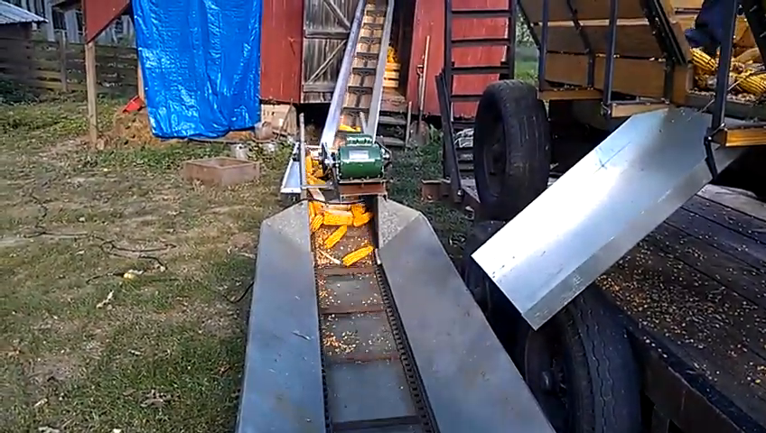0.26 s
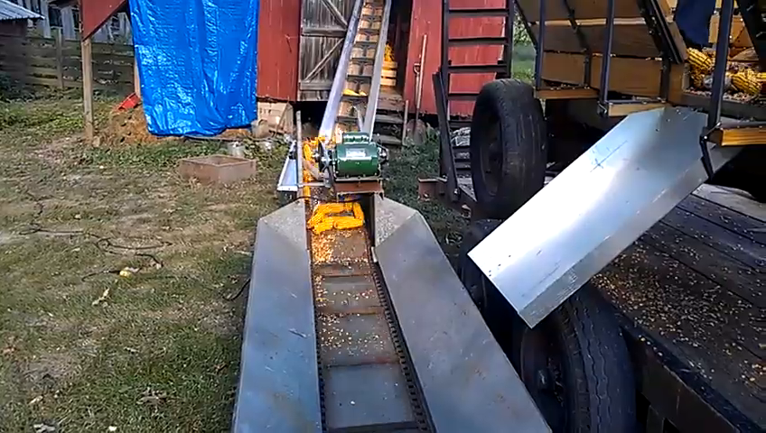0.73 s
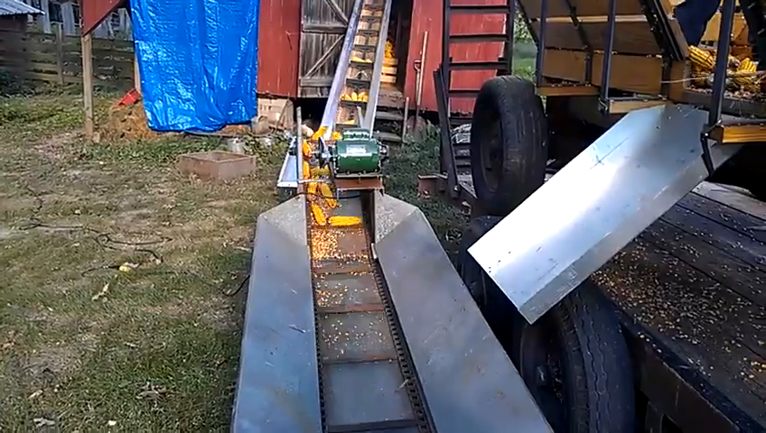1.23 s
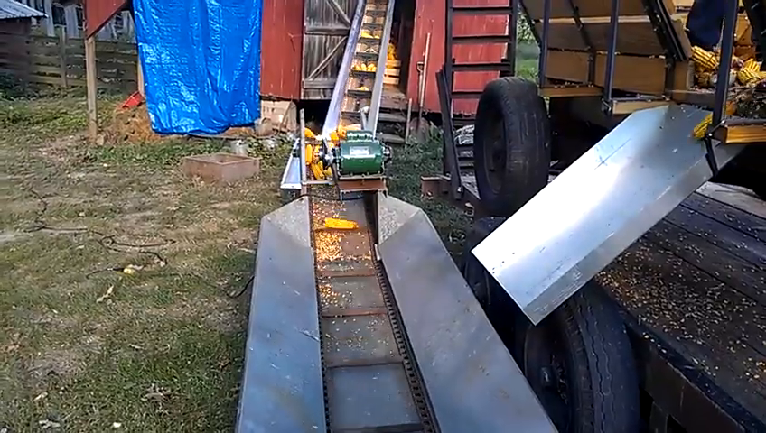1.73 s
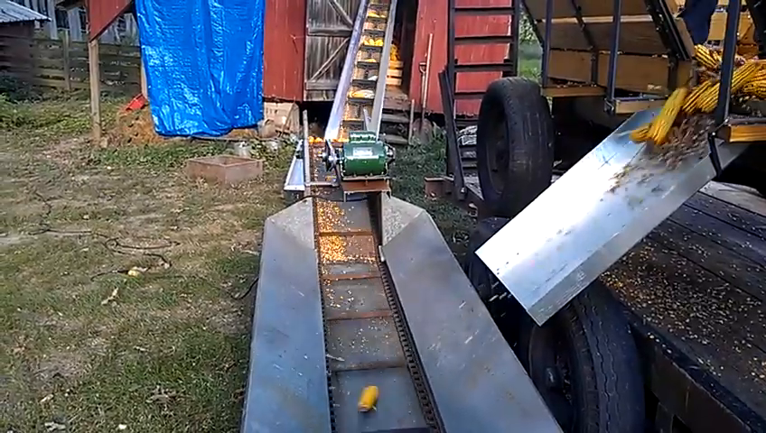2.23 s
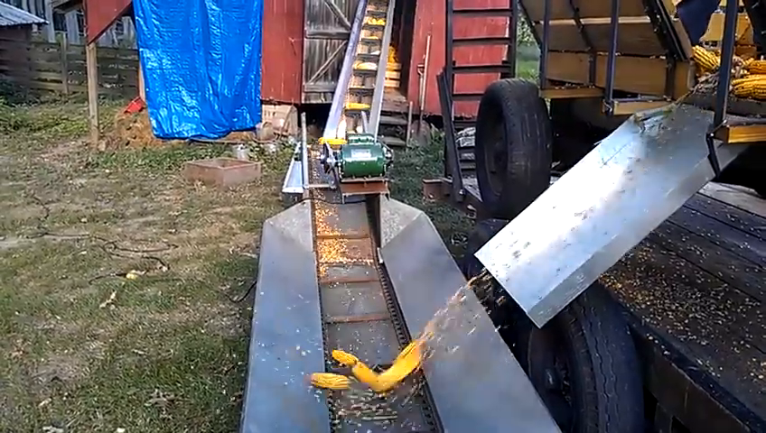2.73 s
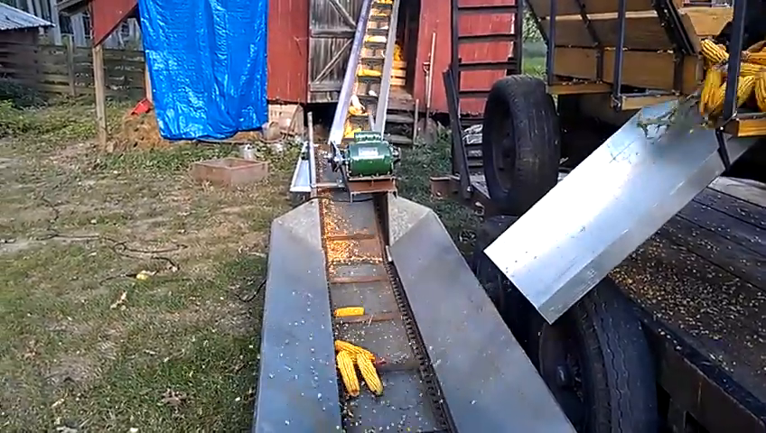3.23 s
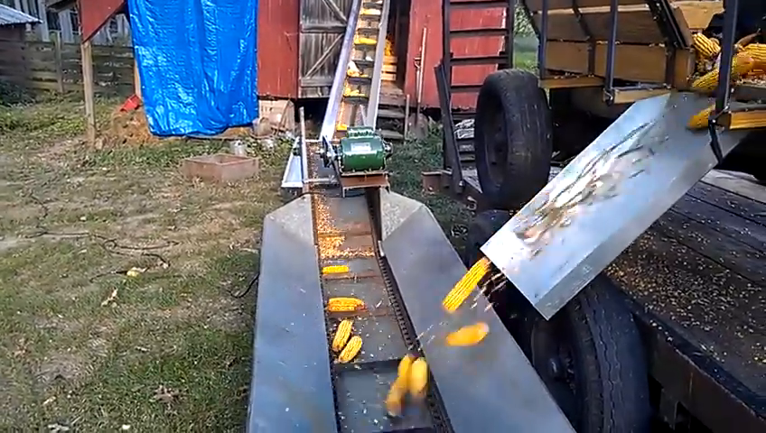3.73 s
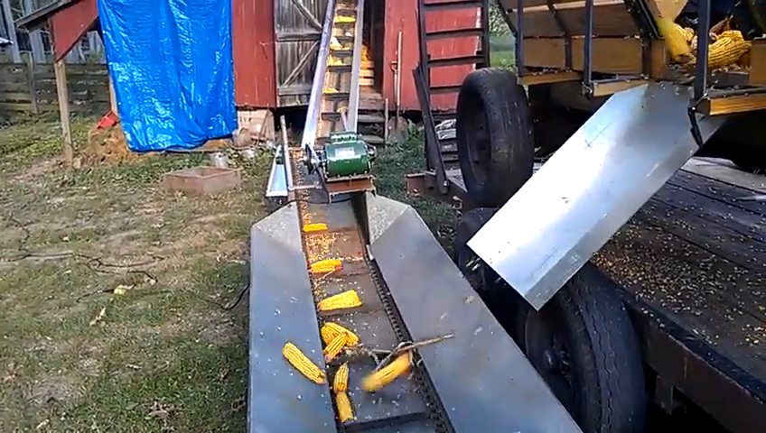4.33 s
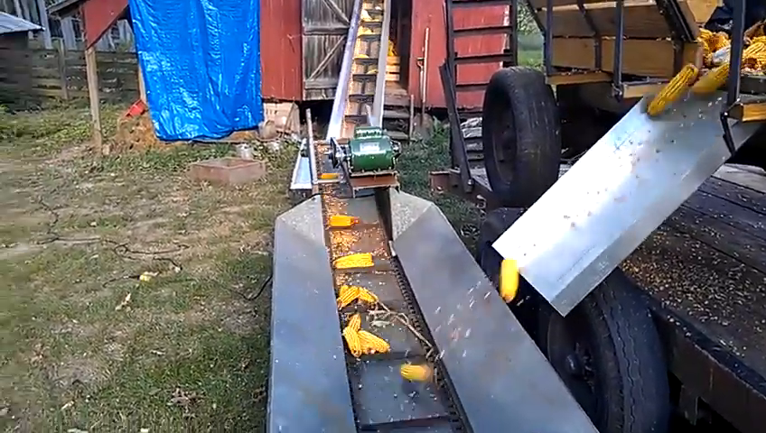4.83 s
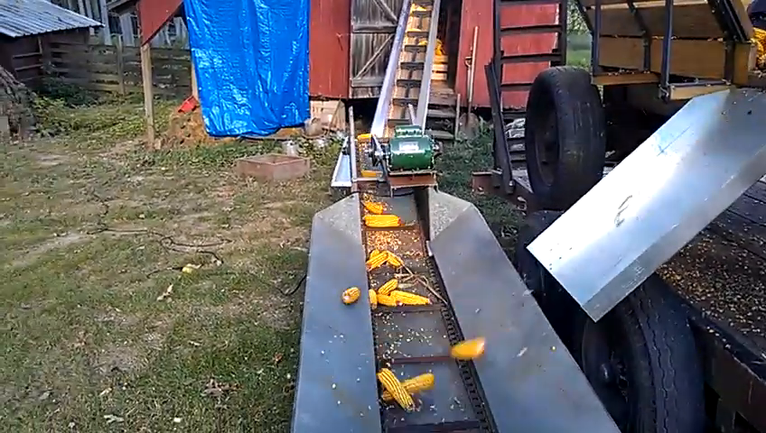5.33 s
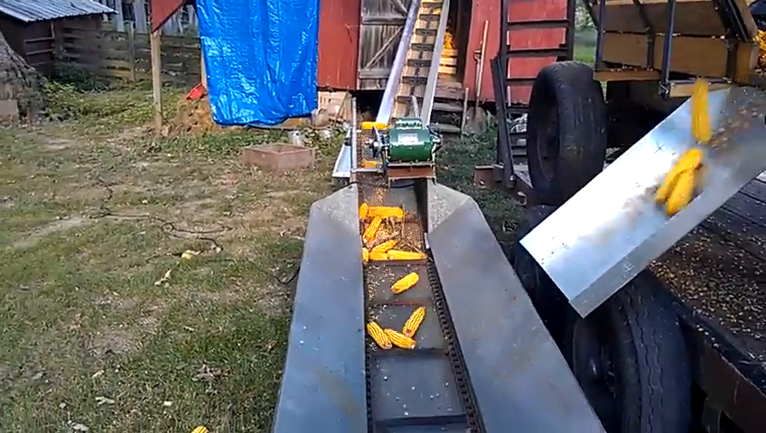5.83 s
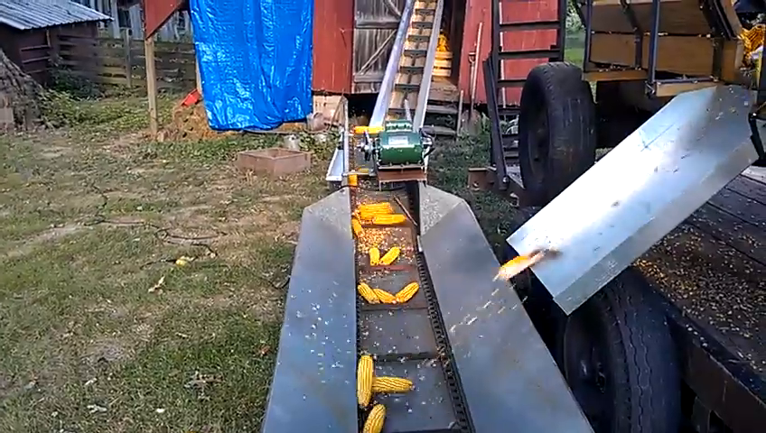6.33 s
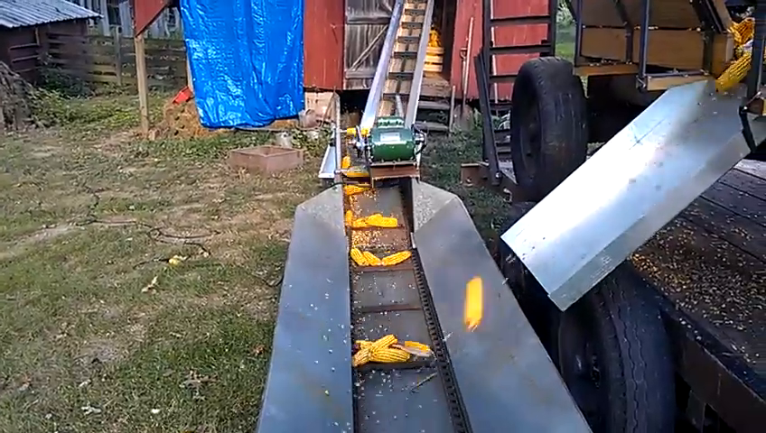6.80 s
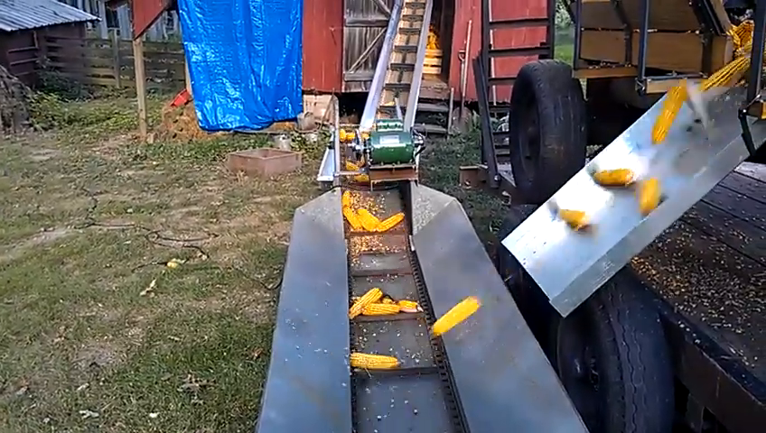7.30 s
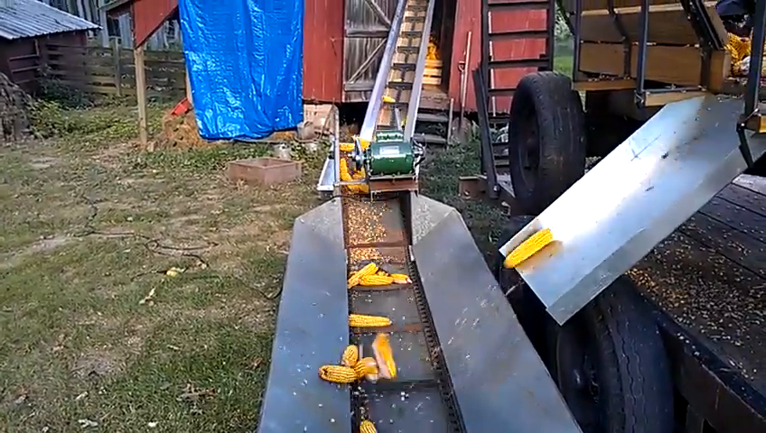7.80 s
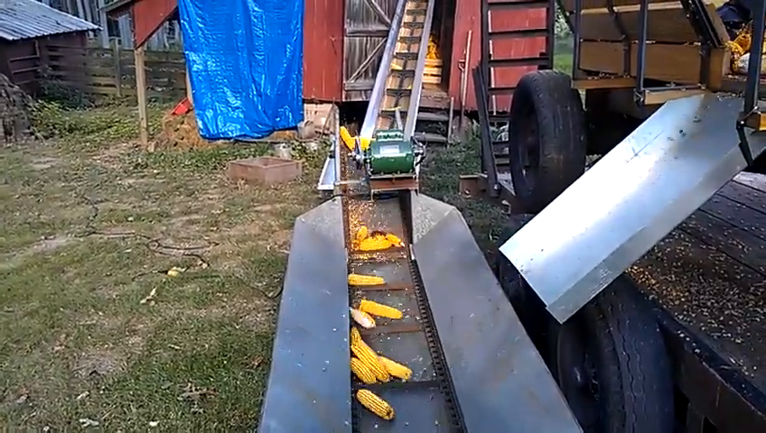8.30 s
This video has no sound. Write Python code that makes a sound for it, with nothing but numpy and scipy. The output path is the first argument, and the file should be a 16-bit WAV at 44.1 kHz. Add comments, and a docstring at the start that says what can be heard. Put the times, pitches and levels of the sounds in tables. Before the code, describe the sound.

A chain conveyor clatters and drones in a steel trough while ears of corn thud and tumble down a metal chute, loose kernels pattering.

```python
"""Chain conveyor carrying ears of corn

In a farmyard, close to a phone microphone, a chain drags slats along a sheet-steel trough: drone, boom and clatter.
Ears of corn bang down a steel chute into the trough, each a dull blow and a tumble; loose kernels patter.
The rattle swells and dips again and again. Every sound is random or timed blows ringing the modes of steel sheet.
"""
import sys
import numpy as np
from scipy import signal
from scipy.fft import rfft, irfft, next_fast_len
from scipy.io import wavfile
from scipy.ndimage import uniform_filter1d

SR = 44100
rng = np.random.default_rng(int(sys.argv[2]) if len(sys.argv) > 2 else 0)


def generate_wav(signal):
    """Clip the signal to [-1, 1] and save it as 16-bit WAV at the path in sys.argv[1]."""
    frames = np.transpose(np.atleast_2d(signal))
    scaled = np.clip(frames, -1, 1) * 32767
    pcm = np.round(scaled).astype(np.int16)
    wavfile.write(sys.argv[1], SR, pcm)


N = 377045  # samples
TOP_HZ = 15650  # highest mode of the steel and edge of the microphone's treble cut

# How strongly small hard knocks, of kernels on steel, ring the sheet: (frequency [Hz], relative level [dB])
PATTER_COLOUR = [(500, -21), (2000, 1.5), (3200, -2.5), (4300, 1.5), (5600, -3.5), (6800, -13.5),
                 (8200, -5), (10500, -5), (13000, -16.5), (15500, -23)]


def conveyor(drone_db, clatter_db, boom_db, steel):
    """Slats scraping the floor make the trough drone and boom; links knock each other and the rails."""
    # How strongly each kind of blow rings the sheet: (frequency [Hz], relative level [dB])
    drone_colour = [(300, -16.5), (430, -23.5), (560, -9), (700, -0.5), (780, 1), (850, 1), (960, -4),
                    (1100, -16), (2000, -11), (5000, -79)]
    boom_colour = [(150, -40), (200, -28), (240, -14.5), (275, -10.5), (300, 3), (325, -7.5), (390, -7),
                   (480, -29.5), (800, -70)]
    clatter_colour = [(300, -58), (1000, -13), (1400, -3), (1900, -0.5), (2500, -5.5), (3100, -11.5),
                      (4300, -12.5), (5500, -18.5), (6300, -24.5), (7000, -30), (8200, -25.5), (9700, -25),
                      (12000, -36.5), (15500, -84)]
    shared_flicker = flicker(12, 0.27)
    slats = hail(900, 1.8)
    links = hail(2000, 2.6)
    drone = strike(slats * shared_flicker * flicker(17, 0.87), drone_colour, steel)
    boom = strike(slats, boom_colour, steel)
    clatter = strike(links * shared_flicker, clatter_colour, steel)
    return undb(drone_db) * drone + undb(boom_db) * boom + undb(clatter_db) * clatter


def ears(steel):
    """A dull first blow on one spot, then the ear tumbles: many rows of kernels knock while it rolls to rest."""
    # Ears striking steel, before the mix gains below:
    # (time [s], level [dB], treble over the thud [dB], first blow over the tumble [dB])
    landings = [(0.231, -18, -30, -6), (0.296, -12, -23, 10), (0.343, -13, -24, 1), (0.405, -8, -20, 7.5),
                (0.45, -9.5, -19, 4), (0.642, -16, -18, 3), (0.759, -9.5, -31, 8), (0.803, -6, -16, -2),
                (0.865, -15, -17, 11), (0.921, -12.5, -16, 10), (0.979, 0.5, -20, 1), (1.201, -9.5, -20, 3),
                (1.324, -11, -26, 4), (1.489, -4, -19, 3), (1.53, -2.5, -19.5, 7), (1.78, -10, -16, 3),
                (1.833, -5, -30, -3), (1.949, -13, -21, 2), (2.042, -4, -30, 1), (2.258, -12, -10, -6),
                (2.287, -15, -11, -1), (2.331, -6, -11.5, 11), (2.654, -10, -20, 5), (2.672, -6, -10, 0),
                (2.743, -6, -9, 0), (2.898, -11, -25, 4), (3.19, -8, -12, 0), (3.266, -7, -25, 0),
                (3.304, -12, -20, -2), (3.354, -10, -23, 7), (3.42, -10, -25, 0), (3.474, -14, -19, 5),
                (3.494, 1.5, -17.5, -5), (3.64, -8.5, -21, 0), (3.788, -8, -12.5, 6),
                (3.838, -1.5, -14.5, 9), (4.191, -14, -10, -3), (4.298, -7, -19, -5), (4.449, -4, -18, 4),
                (4.762, -12, -24, 8), (4.928, -1, -13.5, 2), (5.077, -11, -19, 3), (5.386, -5.5, -26, 8),
                (5.404, 3.5, -17, 5), (5.484, -7, -19, 0), (5.61, -10, -26, -3), (5.739, -10, -21, -2),
                (5.776, -7.5, -24, 8.5), (5.799, -13, -20, 3), (5.891, -0.5, -22, -2), (5.956, -7, -17, 0),
                (6.028, -11, -24, 1), (6.127, 0.5, -14, -1.5), (6.237, -6, -22, 3), (6.635, -1.5, -15, -1),
                (6.803, -6, -27, 4.5), (6.841, -9, -19, 2), (6.867, -9.5, -29, 5), (6.942, -4.5, -21, 6.5),
                (6.982, 3.5, -16.5, -2), (7.296, -10, -21, 7), (7.342, -9, -19, 5), (7.39, -8, -19, 4),
                (7.467, 1, -22, 1), (7.65, -6, -11, 2), (7.672, -1.5, -18.5, 6), (7.763, -8, -19, 2),
                (8.028, -16, -23, 6), (8.063, -9, -16, 0), (8.1, -9, -16, 2), (8.286, -7, -19, 0),
                (8.34, -18, -25, 3), (8.529, -13, -31, 3)]
    # How the first blow and the tumble ring the sheet: (frequency [Hz], relative level [dB])
    knock_colour = [(200, -18), (300, 0.5), (480, -12.5), (680, 5.5), (900, -1.5), (1100, -15),
                    (1900, -8.5), (3200, -17), (8000, -40), (15500, -60)]
    thud_colour = [(150, -52), (220, -21), (300, 1), (440, -15), (720, 10.5), (950, 4), (1100, -27),
                   (1900, 1), (3200, -4.5), (6000, -58)]
    tumble_ms = 20.6
    times, level_db, treble_db, blow_db = np.transpose(landings)
    knocks = hail(1500, 2.0)

    first_blows = np.zeros_like(knocks)
    spot = np.arange(len(times)) % len(first_blows)  # the ears take the spots in turn
    first_blows[spot, (times * SR).astype(int)] = undb(level_db + blow_db)

    thud_flow = bursts(times, level_db, tumble_ms)
    crack_flow = bursts(times, level_db + treble_db, tumble_ms)
    blow = strike(first_blows, knock_colour, steel)
    tumble = strike(knocks * thud_flow, thud_colour, steel)
    cracks = strike(knocks * crack_flow, PATTER_COLOUR, steel)
    return undb(8.5) * blow + undb(-17.0) * tumble + undb(-6.0) * cracks


def kernels(stream_db, steel):
    """Loose kernels tick on the chute and trough walls, singly and by the handful."""
    # Handfuls of kernels thrown on the steel, before the mix gain below: (time [s], level [dB])
    sprays = [(0.4633, -21), (0.85, -22), (0.9457, -20), (1.5239, -22), (1.8173, -30), (2.0403, -32),
              (2.3346, -25), (2.5511, -27), (2.5885, -34), (2.6529, -28), (2.75, -27), (3.15, -25),
              (3.201, -21), (3.3094, -26), (3.4665, -28), (3.6436, -21), (3.8, -12.5), (3.8377, -15),
              (4.2, -18), (4.2428, -22), (4.2911, -18), (4.373, -23), (4.4478, -21), (4.6987, -22),
              (4.9, -19), (4.935, -16), (5.055, -21), (5.3023, -31), (5.378, -19), (5.43, -20),
              (5.4939, -19), (5.78, -24), (5.8326, -21), (5.9499, -23), (6.0272, -31), (6.092, -23),
              (6.137, -21), (6.6358, -21), (6.6932, -24), (6.8882, -22), (6.9895, -12.5), (7.2948, -22),
              (7.3302, -19), (7.3672, -21), (7.4764, -13), (7.6031, -23), (7.6595, -20), (7.8396, -25),
              (8.0755, -12)]
    spray_ms, spray_rise_ms = 28, 4.6
    times, level_db = np.transpose(sprays)
    stream = flicker(14, 2.9) * undb(stream_db)
    handfuls = undb(-10) * bursts(times, level_db, spray_ms, spray_rise_ms)
    return strike(hail(2200, 3.9) * (stream + handfuls), PATTER_COLOUR, steel)


def running_levels():
    """Drone, clatter, boom and kernel-stream levels in dB at every sample, with their swells and dips."""
    # Swells of the rattle; a negative lift lowers it:
    # (time of the top [s], drone lift [dB], clatter lift [dB], boom lift [dB])
    surges = [(.005, 5.5, 5, 11), (.36, 5.5, 4, 3), (.48, 3, 6.5, -5), (.88, 3.5, 2, 2), (.95, 3, 3, 1),
              (1.0, 3, 8, 8), (1.33, 1.5, 1.5, 5), (1.534, 8.5, 10, -1), (1.83, 2, 7.5, 5),
              (1.96, 4.5, 1, 4), (2.063, 8, 9.5, -3), (2.13, 4.5, 3.5, 2), (2.331, 4, 3.7, 2),
              (2.365, 6, 3.5, -5), (2.68, 4.5, 5.5, -4), (2.77, 3, 5, 8), (3.17, 4, -0.8, 2),
              (3.22, 5.5, -2, 7), (3.33, 6, 0, 8), (3.43, 4, 0, 5), (3.5, 2, 8, 9), (3.57, 4.5, -0.5, 5),
              (3.8, 2.5, 3, 6), (3.84, 4.5, 2, 7), (4.21, 3.5, 0, 6), (4.312, 7, 6, 11), (4.378, 8, 6.5, 8),
              (4.455, 1, 0, -2), (4.81, 2.5, -1.5, -1), (4.951, 7, 9, 12.5), (4.985, 2.5, 2, 2),
              (5.12, 4.5, 0, -5), (5.412, 9.5, 9, -4), (5.45, 2, 3.5, 4), (6.05, 4.5, 2.3, 3),
              (6.17, 1, 7.5, 6), (6.24, 2, 1.5, 5), (6.64, 2, 6, 2), (6.675, 6.5, 2.5, 4), (6.9, 3, 0.5, 0),
              (6.95, 0, -2, 8), (7.002, 10, 8.5, 15), (7.43, 6.5, 2, 10), (7.49, 13, 5, 8), (7.67, 0, 7, 9),
              (7.79, 4.5, 2.5, -17), (8.05, 3, -3, -4), (8.097, 7, 11, 12), (8.36, 1.5, -1.5, -10),
              (8.47, 4, -0.5, 3)]
    # Dips of the whole rattle: (time of the bottom [s], depth [dB], recovery [s])
    lulls = [(.06, 4.5, 0.34), (.525, 4, 0.19), (1.085, 4.5, 0.12), (1.44, 0.5, 0.033), (1.67, 3, 0.16),
             (1.9, 4.5, 0.081), (2.19, 3.5, 0.047), (2.45, 7.5, 0.075), (2.5, 6, 0.079), (2.71, 4, 0.037),
             (2.86, 3, 0.07), (2.999, 11, 0.23), (3.25, 4.5, 0.046), (3.62, 2, 0.19), (3.91, 8, 0.24),
             (4.08, 7, 0.14), (4.28, 4, 0.05), (4.559, 9.5, 0.15), (5.02, 2, .08), (5.19, 5.5, 0.25),
             (5.57, 3, 0.2), (6.09, 3, 0.033), (6.29, 9, 0.3), (6.45, 10, 0.24), (6.72, 5, 0.15),
             (7.07, 5.5, 0.56), (7.6, 6, 0.035), (7.73, 5, 0.051), (7.81, 7, 0.13), (7.964, 9.5, 0.078),
             (8.192, 5.5, 0.17)]
    # Stream of loose kernels, before its share of swells and dips: (time [s], level [dB])
    stream = [(0, -46), (.8, -40), (1.0, -37), (1.15, -48), (2.45, -37), (2.55, -31.5), (2.8, -25),
              (3.0, -36.5), (3.3, -34.5), (3.6, -41), (4.1, -36), (4.7, -43.5), (5.3, -32.5), (5.6, -45),
              (6.07, -38), (6.12, -24), (6.25, -27.5), (6.29, -35.5), (6.8, -44), (7.3, -35), (7.9, -40),
              (8.25, -42), (8.55, -59)]
    drone_base_db, clatter_base_db, boom_base_db = -22.5, -23.5, -35  # before swells and dips
    surge_rise_s, surge_fall_s = 0.045, 0.044
    lull_fall_s, lull_bend = 0.062, 1.23  # a bend above 1 holds the bottom longer
    stream_surge, stream_dip = 0.83, 0.43  # the kernels' shares of the clatter lift and of the dips

    t = np.arange(0, N / SR + .002, .001)  # levels are drawn every millisecond
    bottom_s, depth_db, recovery_s = np.transpose(lulls)
    dip_db = depth_db @ tents(t, bottom_s, lull_fall_s, recovery_s, lull_bend)
    top_s, *lifts = np.transpose(surges)
    drone_up, clatter_up, boom_up = np.array(lifts) @ tents(t, top_s, surge_rise_s, surge_fall_s)

    drone_db = drone_base_db + drone_up - dip_db
    clatter_db = clatter_base_db + clatter_up - dip_db
    boom_db = boom_base_db + boom_up - dip_db
    stream_db = np.interp(t, *np.transpose(stream)) + stream_surge * clatter_up - stream_dip * dip_db
    sample_s = np.arange(N) / SR
    return [np.interp(sample_s, t, db) for db in (drone_db, clatter_db, boom_db, stream_db)]


def sheet():
    """Steel sheet has evenly dense modes: their pitches and fading rings, each of about equal energy."""
    t60_1khz_s, damping = 0.086, 0.32  # ring time at 1 kHz; power of frequency by which it shortens
    hz = np.arange(140, TOP_HZ, 20.)
    hz += rng.uniform(-6, 6, len(hz))
    t60 = t60_1khz_s * (hz / 1000) ** -damping
    t = np.arange(3072) / SR  # rings stop after 70 ms
    fade = np.exp(-np.log(1000) * np.outer(1 / t60, t))
    rings = np.sin(2 * np.pi * np.outer(hz, t)) * fade
    return hz, rings / np.sqrt(t60)[:, None]


def strike(blows, colour, steel):
    """Each row of blows falls on its own spot of the sheet, which rings every mode with its own share."""
    hz, rings = steel
    colour_hz, colour_db = np.transpose(colour)
    gain = undb(np.interp(np.log(hz), np.log(colour_hz), colour_db))
    share = rng.standard_normal((len(blows), len(hz)))
    share /= np.sqrt(np.sum(share ** 2, axis=0))  # over all spots, every mode gets its due
    spots = (share * gain) @ rings
    spots /= np.sqrt(np.sum(spots ** 2, axis=1, keepdims=True))  # every spot rings with equal energy
    size = next_fast_len(N + spots.shape[1])
    spectrum = np.sum(rfft(blows, size) * rfft(spots, size), axis=0)
    return irfft(spectrum, size)[:N]


def hail(rate, spread_db, clump_db=2.0, count=6):
    """Random ticks, rate a second over count spots; a few are harder than the rest, up to a limit."""
    spot, when, hard = rng.random((3, int(rate * N / SR)))
    spot = (spot * count).astype(int)
    # each spot is busy or quiet for some 40 ms at a time, so the ring keeps changing colour
    stretches = 214
    busy = rng.standard_normal((count, stretches))[spot, (when * stretches).astype(int)]
    hardness = np.minimum(-np.log(hard), 3.5)
    ticks = np.zeros((count, N))
    ticks[spot, (when * N).astype(int)] = undb(spread_db * hardness + clump_db * busy)
    return unit(ticks) / np.sqrt(count)


def flicker(rate, depth_db):
    """Random unevenness: the loudness takes random levels, rate a second, and slews between them."""
    hold = int(SR / rate)
    steps = np.repeat(rng.standard_normal(N // hold + 1), hold)
    return undb(depth_db * uniform_filter1d(steps, hold)[:N])


def bursts(times, level_db, ms, rise_ms=2):
    """Gains that rise at each time and die away over ms."""
    out = np.zeros(N + 4096)  # room for the last tail
    age_ms = np.arange(4096) / SR * 1000
    shape = np.minimum(age_ms / rise_ms, 1) * np.exp(-(age_ms / ms) ** 1.4)
    for s, db in zip(times, level_db):
        out[int(s * SR):][:len(age_ms)] += undb(db) * shape
    return out[:N]


def tents(t, times, before_s, after_s, bend=1):
    """One row for each time: climbs from 0 to 1 over before_s, returns to 0 over after_s."""
    age = t - times[:, None]
    late = np.maximum(age, 0) / np.maximum(np.reshape(after_s, (-1, 1)), .01)
    return np.maximum(np.where(age < 0, 1 + age / before_s, 1 - late ** bend), 0)


def undb(db):
    """Decibels to amplitude."""
    return 10 ** (np.asarray(db) / 20)


def unit(x):
    """Scale to an RMS of 1."""
    return x / np.sqrt(np.mean(x ** 2))


def scene():
    """Conveyor, ears and kernels all ring the same steel."""
    drone_db, clatter_db, boom_db, stream_db = running_levels()
    steel = sheet()
    rattle = conveyor(drone_db, clatter_db, boom_db, steel)
    return (rattle + ears(steel) + kernels(stream_db, steel))[None]


def record(dry):
    """The phone cuts the bass, rounds only the loudest peaks, thins the bass again and cuts the top."""
    knee, ceiling = .5, .73  # of full scale, ahead of the last two filters
    thin = signal.sosfilt(signal.butter(5, 250, "high", fs=SR, output="sos"), dry)
    over = np.maximum(np.abs(thin) - knee, 0)
    room = ceiling - knee
    rounded = thin - np.sign(thin) * (over - room * np.tanh(over / room))
    thinner = signal.sosfilt(signal.butter(1, 70, "high", fs=SR, output="sos"), rounded)
    return signal.sosfilt(signal.ellip(12, .2, 80, TOP_HZ, fs=SR, output="sos"), thinner)


dry = scene()
out = record(dry)
generate_wav(out)
```